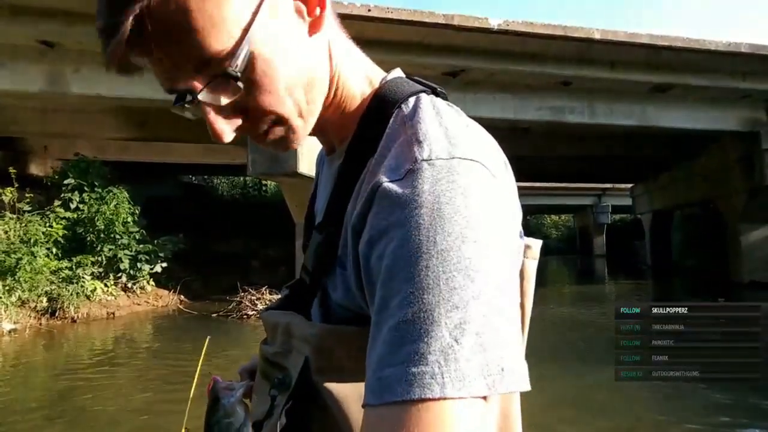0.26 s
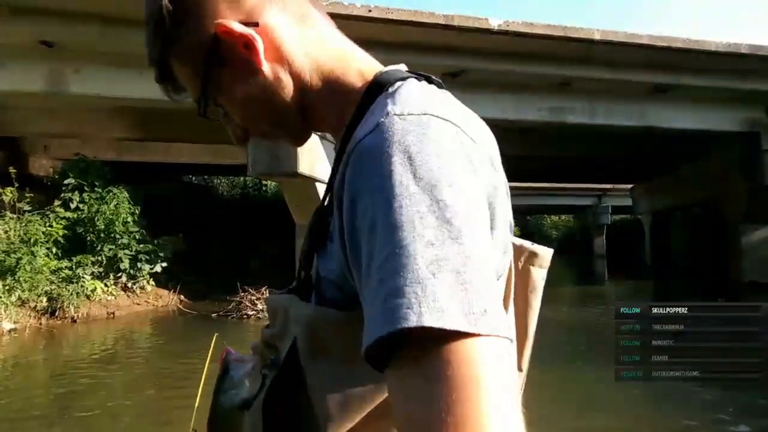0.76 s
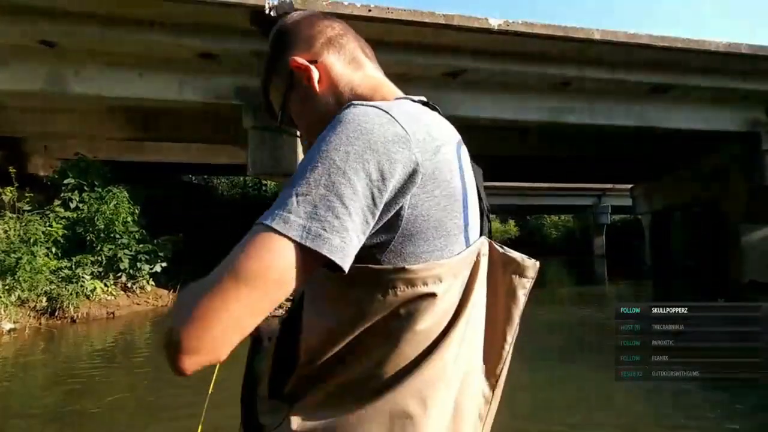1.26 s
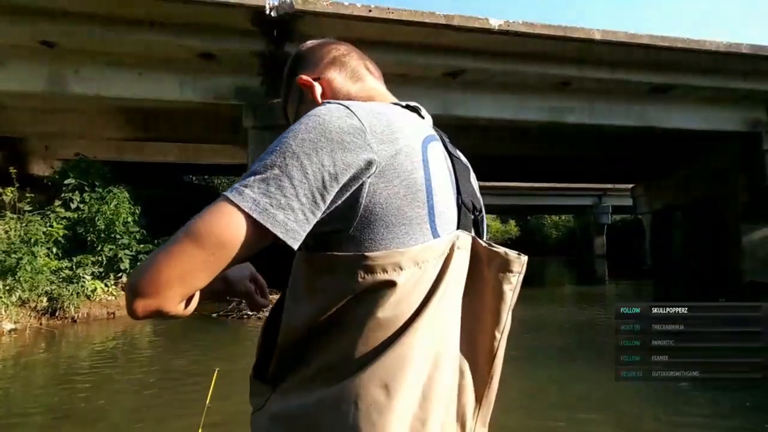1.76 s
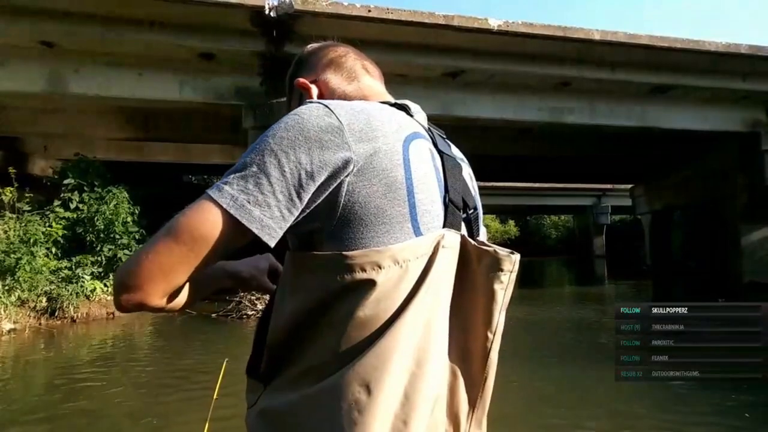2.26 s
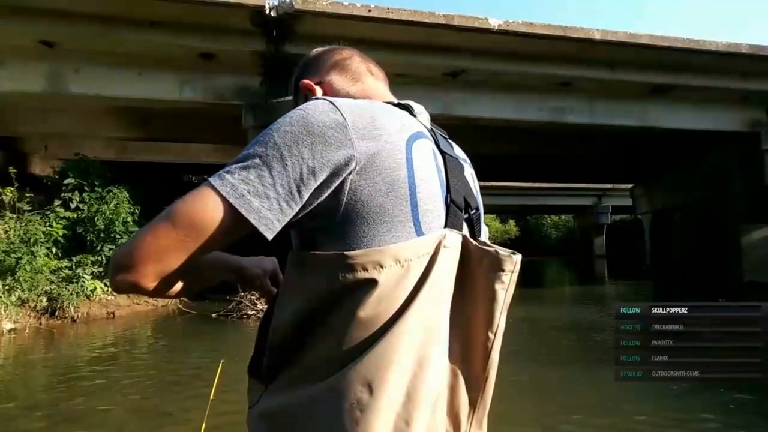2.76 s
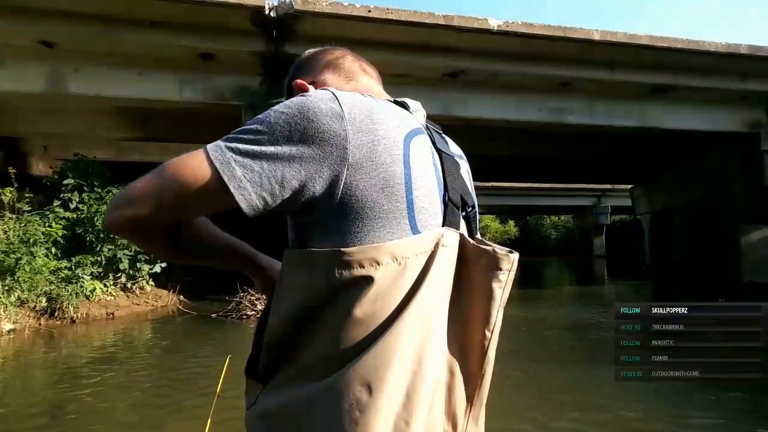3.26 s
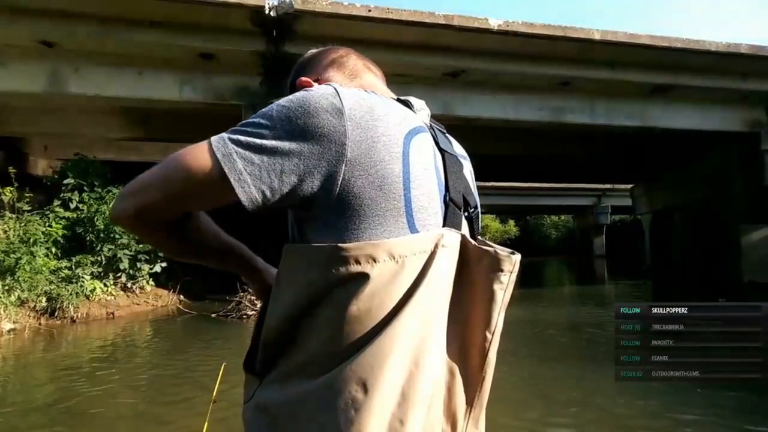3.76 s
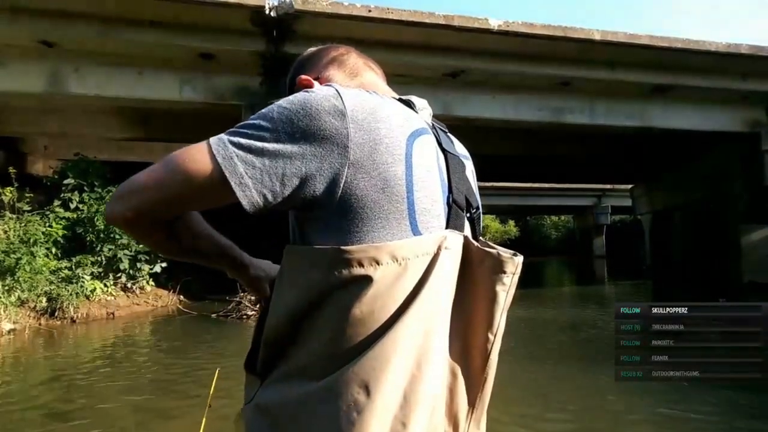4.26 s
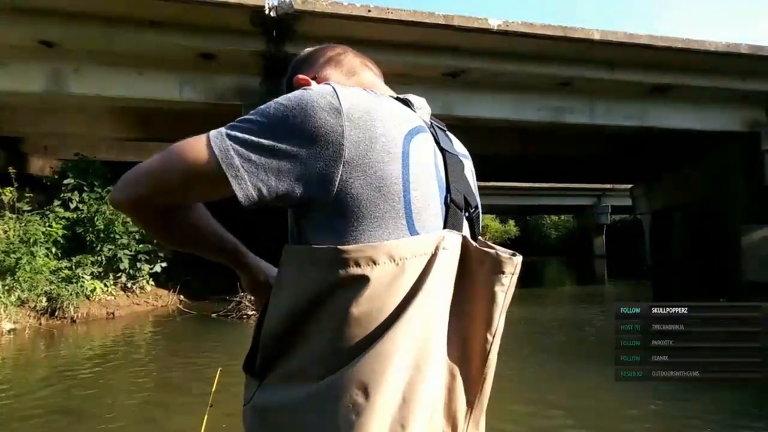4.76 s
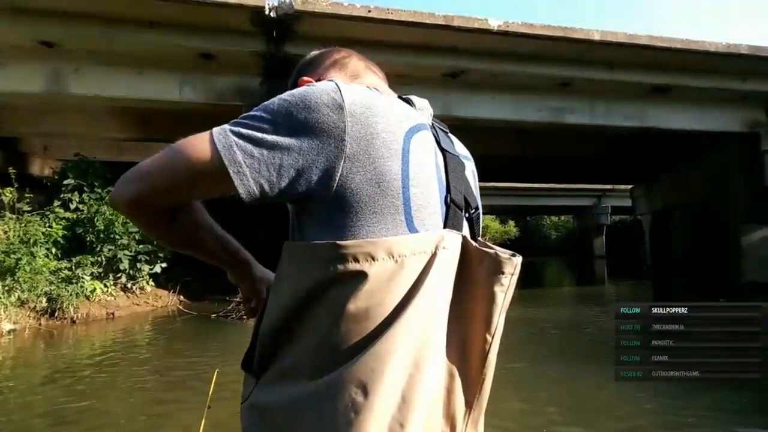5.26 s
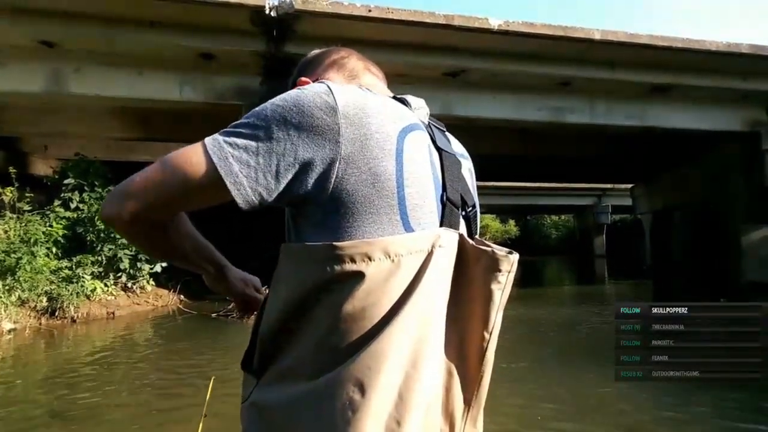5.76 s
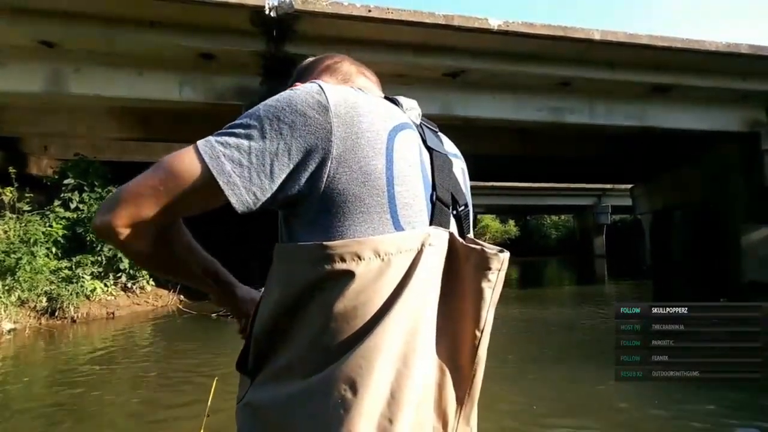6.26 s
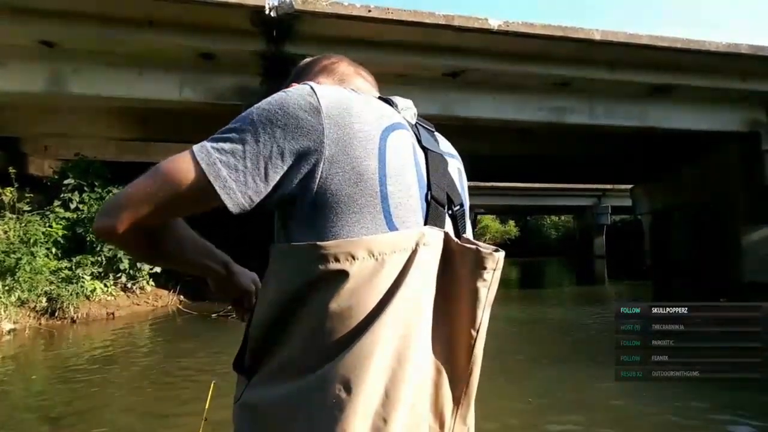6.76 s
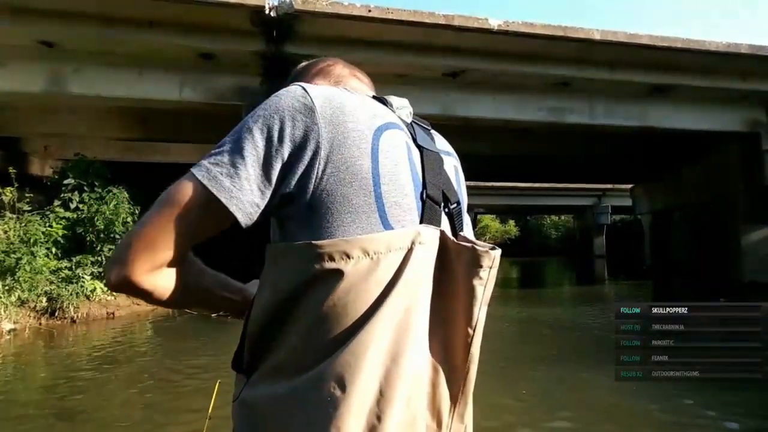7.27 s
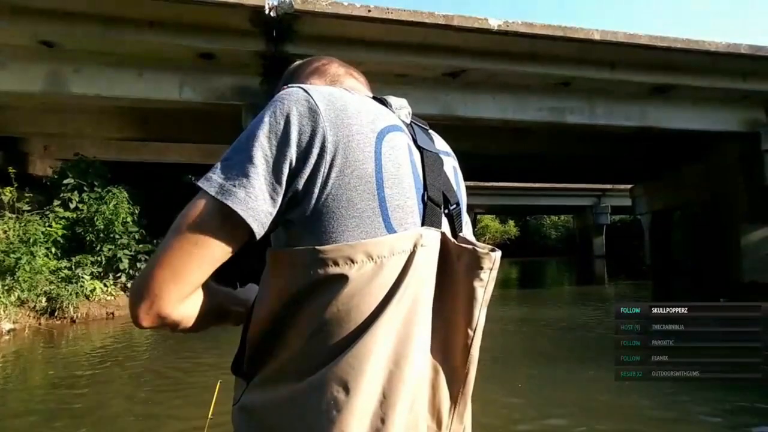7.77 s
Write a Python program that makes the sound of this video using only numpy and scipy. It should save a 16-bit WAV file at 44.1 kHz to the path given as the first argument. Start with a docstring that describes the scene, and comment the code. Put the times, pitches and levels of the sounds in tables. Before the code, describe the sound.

A vehicle engine drones low under a highway bridge and slowly swells over tyre wash, amid shrill crickets, cicadas, small drips, clicks and bird chirps.

```python
"""An engine drones under a highway bridge and slowly grows, over deck rumble and tyre wash, above a summer creek.
Engines are sines with noise bands; road, cicada and katydid are shaped noise; cricket strokes are sagging tones.
A cicada pulses and winds down; a katydid buzzes, later ticks and buzzes again, very high.
A soft low noise thump, as of wind or a knock on the microphone, comes early; a wader makes drips (rising
bubble tones) and tackle clicks (noise rings); a small bird chirps in gliding sines."""
import sys
import numpy as np
from scipy import signal
from scipy.fft import rfft, irfft, next_fast_len
from scipy.io import wavfile
from scipy.ndimage import map_coordinates

SR = 44100
rng = np.random.default_rng(int(sys.argv[2]) if len(sys.argv) > 2 else 0)


def store_pcm(level_fs):
    """Save levels as 16-bit WAV."""
    pcm = np.round(np.clip(level_fs, -1, 1) * 32767).astype(np.int16)
    wavfile.write(sys.argv[1], SR, np.atleast_2d(pcm).T)


N = 353770
T = np.arange(N) / SR  # seconds

# Main engine speed. Each row: time in seconds, firing rate in Hz.
FIRING_RATE = [(0, 84.33), (2, 83.97), (4, 84.22), (6, 83.98), (8, 84.07)]
# Exhaust tone at the firing rate. Each row: time in seconds, rms level in dB before trim.
FIRING_LEVEL = [(0, -38.5), (1, -33.5), (2, -35.5), (4.2, -32.5), (6.8, -31.5), (7.4, -25.5), (8, -22.5)]
# Its octave, which booms under the deck. Each row: time in seconds, rms level in dB before trim.
OCTAVE_LEVEL = [(0.0, -34), (0.33, -30.5), (2.45, -32.5), (2.56, -29.5), (3.41, -30), (3.45, -33.5),
                (3.76, -27.5), (4.81, -26), (4.9, -29), (6.68, -29), (6.77, -25.5), (7.71, -31), (8.0, -21)]
FIRING_TRIM_DB, OCTAVE_TRIM_DB = -0.5, -0.02
# Weaker tones of other engines. Each row: pitch in Hz, level in dB before their common growth.
OTHER_ENGINE_TONES = [(46, -51.5), (115.5, -44), (204, -52.5), (221, -59.5)]
# A slower engine beats against the main one.
RIVAL_HZ, RIVAL_DRIFT_HZ, RIVAL_PEAK_DB = 79.9, 0.9, -37.5
RIVAL_PASSES_S, RIVAL_SPREAD_S = 5, 1.46

# Deck rumble spectrum. Each row: frequency in Hz, relative density in dB per Hz.
RUMBLE_SPECTRUM = [(18, -10), (32, -12), (45, -6), (65, 1), (100, -4), (135, -5.5), (160, 2), (190, -11.5),
                   (250, -15.5), (300, -24.5), (450, -29.5), (900, -55)]
RUMBLE_START_DB, RUMBLE_GROWTH_DB_PER_S = -37.8, 0.28  # the deck shakes harder as traffic nears
# Tyre wash spectrum. Each row: frequency in Hz, relative density in dB per Hz.
TYRE_SPECTRUM = [(200, -6), (420, -7.5), (600, -3), (740, 1.5), (880, 2.5), (1150, 0.5), (1650, -1),
                 (2200, -5.5), (2900, -10), (5500, -10.5), (9500, -23.5), (11500, -33.5), (16000, -29)]
# Tyre wash. Each row: time in seconds, level in dB before trim.
TYRE_LEVEL = [(0, -53), (1.5, -52.5), (4.6, -52.5), (6.2, -51.5), (7, -49.5), (8, -48.5)]
TYRE_TRIM_DB = 4.0
# Tread whine of passing vehicles.
# Each row: loudest time in seconds, spread in seconds, pitch in Hz, width in Hz, peak level in dB.
TREAD_WHINES = [(0, 1.7, 863, 90, -56.5), (0, 1.4, 1384, 110, -59.5), (6.0, 0.75, 1560, 905, -52)]

# Far cricket chorus spectrum. Each row: frequency in Hz, relative density in dB per Hz.
CHORUS_SPECTRUM = [(5600, -64), (5950, -5), (6080, -32), (6400, -12), (6700, -1.5), (7080, 1.5),
                   (7400, -7.5), (7560, -3), (7780, -7), (8020, -4.5), (8250, -12.5), (8700, -22),
                   (9500, -43.5)]
# Near crickets. Each row: start in seconds, end in seconds, first stroke in seconds, pitch in Hz, fall in Hz,
# sounding share of the cycle 0-1, rms level in dB, echo in dB re song, octave in dB re fundamental.
NEAR_CRICKETS = [(-1, 9, .004, 6280, 170, .73, -41, -13, -27), (-1, 5.7, .012, 7170, 170, .6, -44, -5, -42),
                 (-1, 9, .006, 7975, 140, .6, -48.5, -6, -45),
                 (5.5, 7.8, .005, 8385, 130, .55, -48.3, -8, -45)]
# Wing stroke rates of the near crickets. Each entry: strokes per second.
CRICKET_STROKES_PER_S = [32.96, 34.2, 47.7, 57.2]

# Near cicada: effort sinks in an S-curve; pitch, bandwidth and loudness follow it.
CICADA_DB, CICADA_FULL_HZ, CICADA_SPENT_HZ = -44.5, 5227, 3612
CICADA_FULL_WIDTH_HZ, CICADA_SPENT_WIDTH_HZ = 1050, 600
CICADA_TIRES_S, CICADA_WIND_DOWN_S, CICADA_FADE_DB_PER_DECADE = 5.5, 0.6, 17.5
# Even surges while it is fresh.
SURGE_COUNT, SURGE_FIRST_S, SURGE_PERIOD_S, SURGE_DB = 6, 0.39, 0.596, -41.5
SURGE_RISE_S, SURGE_FALL_S = 0.054, 0.12
# Spectrum of surges and far cicadas. Each row: frequency in Hz, relative density in dB per Hz.
RASP_SPECTRUM = [(2700, -39), (3000, -5), (3200, 1.5), (3550, 1.5), (4150, 5), (4800, 4.5), (5400, 2),
                 (6200, -46)]
# Far cicadas. Each row: time in seconds, level in dB.
FAR_CICADA_LEVEL = [(0, -46.5), (4.2, -49.5), (6, -53), (8, -55)]

# Katydid buzzes. Each row: start in seconds, end in seconds, strokes per second, peak level in dB.
BUZZES = [(0.001, .98, 29.0, -49), (7.832, 8.05, 28, -54)]
# Katydid wing resonance. Each row: frequency in Hz, relative density in dB per Hz.
WING_SPECTRUM = [(7500, -13), (9500, -8.5), (11500, -12.5), (13300, -8), (14200, -4), (14650, 2),
                 (15000, -2), (15500, -4)]
# The katydid warms up: ticks come closer over TICK_HURRY_S and louder over TICK_SWELL_S.
TICK_COUNT, TICK_FIRST_S, TICK_RISE_S, TICK_FALL_S = 15, 6.5, 0.0047, 0.007
TICK_SLOW_GAP_S, TICK_FAST_GAP_S, TICK_HURRY_S = 0.102, 0.0807, (6.66, 6.98)
TICK_SOFT_DB, TICK_LOUD_DB, TICK_SWELL_S = -59.5, -46.5, (6.7, 7.25)

# Soft low thump. Each row: centre in Hz, width in Hz, peak level in dB.
THUMP_BANDS = [(57, 26, -24.5), (322, 130, -37), (736, 170, -43.5)]
THUMP_S, THUMP_SPREAD_S = 0.17, 0.048
# Drips. Each row: time in seconds, starting bubble pitch in Hz, level in dB before the attack.
DRIP_BUBBLES = [(1.282, 570, -35), (1.568, 1360, -33), (1.8, 3200, -32.5), (1.85, 600, -39),
                (1.867, 2800, -36), (1.885, 3210, -28.5), (2.046, 3200, -34), (2.062, 2300, -33.5),
                (2.128, 760, -29.5), (2.137, 1150, -35)]
DRIP_T60_S, DRIP_ATTACK_S, DRIP_GLIDE_SHARE = 0.034, 0.0013, 0.063
# Tackle clicks. Each row: time in seconds, starting level in dB, ring centre in Hz.
TACKLE_CLICKS = [(1.293, -32, 3440), (1.888, -36, 3600), (2.038, -30, 4300), (2.19, -49, 10000),
                 (4.669, -40.5, 10200), (5.551, -38, 10800), (6.065, -35, 10400), (6.066, -25.5, 4420),
                 (6.158, -33, 3700)]
CLICK_DECAY_S, CLICK_WIDTH_HZ = 0.0015, 2800

# Bird chirps. Each row: start in seconds, length in seconds, top pitch in Hz, place of the top in the note 0-1,
# arch as share of pitch lost one length from the top, peak level in dB before flutter.
CHIRPS = [(4.012, 0.03, 4700, .5, .9, -36), (4.036, 0.03, 5970, .6, .4, -42),
          (4.068, .022, 3520, 0.7, .3, -44), (4.084, .018, 6000, 0, .23, -38),
          (4.19, .022, 4730, .17, 0.24, -39), (4.268, .028, 4800, 0.03, 0.165, -40),
          (4.325, .018, 3360, .45, .1, -44.5), (4.74, 0.027, 4590, .5, .55, -37.5),
          (5.505, .032, 4950, .42, .55, -39.5), (5.53, .06, 5950, .35, .38, -46),
          (5.568, .02, 3550, .5, .1, -44), (6.318, .034, 6000, 0.97, .45, -46),
          (6.322, .042, 4490, 0.81, 0.54, -39), (7.17, .022, 4270, .9, .25, -42)]
# Long wavering whistle of the bird. Each row: time in seconds, pitch in Hz.
WHISTLE_PITCH = [(6.992, 3790), (7.015, 4260), (7.04, 4440), (7.09, 3980), (7.135, 3700), (7.155, 4100),
                 (7.172, 4750)]
WHISTLE_DB, BIRD_EDGE_S = -44.5, 0.0027  # edge: attack and release

TOP_HZ = 15600


def undb(db):
    """Decibels to gain."""
    return 10 ** (np.asarray(db) / 20)


def unit(x):
    """Scale to rms 1."""
    return x / np.sqrt(np.mean(x ** 2) + 1e-20)


def curves(table):
    """Each column of a timed table, joined by straight lines."""
    s, *columns = np.transpose(table)
    return [np.interp(T, s, c) for c in columns]


def shaped(gain):
    """Noise of rms 1 whose spectrum follows gain(Hz)."""
    size = next_fast_len(N, True)
    hz = np.maximum(np.arange(size // 2 + 1) * SR / size, 1)
    spectrum = rfft(rng.standard_normal(size)) * gain(hz)
    return unit(irfft(spectrum, size)[:N])


def coloured(points):
    """Noise through (Hz, dB) points on a log frequency axis, rolled off past both ends."""
    hz, db = np.transpose(points)

    def gain(f):
        low_cut = 1 + (hz[0] / f / 2) ** 2
        high_cut = 1 + (f / hz[-1] / 2) ** 2
        return undb(np.interp(np.log(f), np.log(hz), db)) / low_cut / high_cut

    return shaped(gain)


def resonance(hz, width_hz):
    """Noise in a resonance whose width is taken at half amplitude."""
    return shaped(lambda f: 1 / (1 + ((f - hz) / width_hz * 2) ** 2))


def walk(rate_hz):
    """Smooth random drift of spread about 1, changing about rate_hz times a second."""
    knots = rng.standard_normal(4096)
    drift = map_coordinates(knots, [T[::32] * rate_hz], order=3, mode="wrap")
    return drift.repeat(32)[:N]


def turns(hz):
    """Running phase, in radians, of a moving frequency."""
    return 2 * np.pi * np.cumsum(hz) / SR


def echo(x, t60_s):
    """Diffuse reflections from banks and concrete: decaying noise of unit energy after a 4 ms gap."""
    t = T[:SR]
    tail = rng.standard_normal(SR) * undb(-60 * t / t60_s) * (t > 0.004)
    return signal.fftconvolve(x, tail / np.sqrt(np.sum(tail ** 2)))[:N]


def engines():
    """A near-steady exhaust tone with a strong octave; a slower engine beats against it, others waver and grow."""
    hz, = curves(FIRING_RATE)
    firing_db, = curves(FIRING_LEVEL)
    octave_db, = curves(OCTAVE_LEVEL)
    phase = turns(hz * (1 + 0.0026 * walk(6)))
    firing = undb(firing_db + FIRING_TRIM_DB + 1.2 * walk(12)) * np.sin(phase + 0.31 * walk(11))
    octave_wave = np.sin(2 * phase) + undb(-32) * np.sin(3 * phase)  # with a trace of third harmonic
    octave = undb(octave_db + OCTAVE_TRIM_DB + 1.1 * walk(11)) * octave_wave
    nearness = 1 / np.hypot(1, (T - RIVAL_PASSES_S) / RIVAL_SPREAD_S)
    rival_wave = np.sin(turns(RIVAL_HZ + RIVAL_DRIFT_HZ * walk(1.97)))
    rival = undb(RIVAL_PEAK_DB) * nearness * rival_wave
    others = sum(undb(db) * resonance(f, 4.6) for f, db in OTHER_ENGINE_TONES)
    growth_db = np.interp(T, [1.5, 4.2], [-6, 1.5])
    return np.sqrt(2) * (firing + octave + rival) + others * undb(growth_db)  # sqrt(2): sine levels are rms


def road():
    """Wheels shake the deck, tyres hiss beyond its edge; single vehicles' treads sing as they pass."""
    rumble_db = RUMBLE_START_DB + RUMBLE_GROWTH_DB_PER_S * T + 1.0 * walk(8.9)
    rumble = coloured(RUMBLE_SPECTRUM) * undb(rumble_db)
    tyre_db, = curves(TYRE_LEVEL)
    wash = coloured(TYRE_SPECTRUM) * undb(tyre_db + TYRE_TRIM_DB + 0.5 * walk(9.8))
    whine = 0
    for peak_s, spread_s, hz, width_hz, db in TREAD_WHINES:
        passing = np.exp(-((T - peak_s) / spread_s) ** 2)
        whine = whine + undb(db) * resonance(hz, width_hz) * passing
    return rumble + wash + whine


def crickets():
    """Each stroke is a short tone that catches once and sags as the wing slows; far singers blur into a band."""
    out = coloured(CHORUS_SPECTRUM) * undb(-38.5 + 0.5 * walk(12.0))
    for rate, row in zip(CRICKET_STROKES_PER_S, NEAR_CRICKETS):
        start_s, end_s, first_s, hz, fall_hz, share, db, echo_db, octave_db = row
        cycle = ((T - first_s) * rate + 0.012 * walk(3)) % 1
        stroke = np.minimum(cycle / share, 1)  # silent at 1
        catch = np.exp(-((stroke - 0.58) / 0.06) ** 2)
        phase = turns(hz - fall_hz * stroke ** 2.5 + 24 * walk(300))
        flutter = undb(0.4 * walk(30) + 1.7 * walk(500))
        force = np.abs(np.sin(np.pi * stroke)) ** 0.6 * (1 - 0.55 * catch) * flutter
        fundamental = unit(force * np.sin(phase))
        octave = unit(force ** 2 * (1 - stroke) * np.sin(2 * phase))  # the file bites hardest early
        singing = np.clip((T - start_s) / 0.2, 0, 1) * np.clip((end_s - T) / 0.023, 0, 1)
        song = (fundamental + undb(octave_db) * octave) * undb(db) * singing
        out = out + song + undb(echo_db) * echo(song, 0.32)
    return out


def reflected(x):
    """A few hard reflections off deck and water comb the sound into fixed fine bands."""
    lags = rng.integers(150, 1300, 7)  # samples
    return unit(x + 0.25 * sum(np.roll(x, lag) for lag in lags))


def surges(count):
    """Evenly spaced swells that rise faster than they fall."""
    since_s = T - SURGE_FIRST_S - SURGE_PERIOD_S * np.arange(count)[:, None]
    spread_s = np.where(since_s < 0, SURGE_RISE_S, SURGE_FALL_S)
    return np.exp(-0.5 * (since_s / spread_s) ** 2).sum(axis=0)


def cicada():
    """Rapid tymbal buckles ring the abdomen; the song surges, then sinks in pitch, narrows and dies away."""
    effort = 1 / (1 + np.exp((T - CICADA_TIRES_S) / CICADA_WIND_DOWN_S))
    buckles = 1 + 0.16 * np.sin(turns(260 + 25 * walk(22)))
    phase = turns(CICADA_SPENT_HZ + (CICADA_FULL_HZ - CICADA_SPENT_HZ) * effort)

    def ring(width_hz):
        """Noise band riding on the moving pitch."""
        return resonance(0, width_hz) * np.sin(phase) + resonance(0, width_hz) * np.cos(phase)

    fresh = ring(CICADA_FULL_WIDTH_HZ) * np.sqrt(effort)
    spent = ring(CICADA_SPENT_WIDTH_HZ) * np.sqrt(1 - effort)
    song_db = CICADA_DB + CICADA_FADE_DB_PER_DECADE * np.log10(effort)
    song = reflected((fresh + spent) * buckles) * undb(song_db)
    far_db, = curves(FAR_CICADA_LEVEL)
    rasp_gain = np.hypot(undb(SURGE_DB) * surges(SURGE_COUNT), undb(far_db + 0.23 * walk(8)))
    return song + reflected(coloured(RASP_SPECTRUM) * buckles) * rasp_gain


def ticks(count):
    """Single scrapes that hurry and swell."""
    force, s = 0, TICK_FIRST_S
    for _ in range(count):
        db = np.interp(s, TICK_SWELL_S, [TICK_SOFT_DB, TICK_LOUD_DB])
        spread_s = np.where(T < s, TICK_RISE_S, TICK_FALL_S)
        force = force + undb(db) * np.exp(-np.abs(T - s) / spread_s)
        s = s + np.interp(s, TICK_HURRY_S, [TICK_SLOW_GAP_S, TICK_FAST_GAP_S])
    return force


def katydid():
    """A toothed file scrapes in buzzes and single ticks; teeth catch with uneven force."""
    force = ticks(TICK_COUNT)
    for start_s, end_s, rate, db in BUZZES:
        strokes = undb(4.5 * (np.cos(2 * np.pi * rate * (T - start_s)) - 1))
        force = force + undb(db) * strokes * (T > start_s - 0.01) * (T < end_s)
    teeth = undb(1.4 * walk(1000))
    return force * unit(teeth * coloured(WING_SPECTRUM))


def thump():
    """A soft low thump, as of wind or a knock on the microphone: noise bands that swell and fade."""
    push = np.exp(-np.abs(T - THUMP_S) / THUMP_SPREAD_S)
    return push * sum(undb(db) * resonance(hz, width_hz) for hz, width_hz, db in THUMP_BANDS)


def wader():
    """Drops ring in the creek as rising bubbles; tackle clicks close by as short noise rings."""
    out, t = np.zeros(N), T[:SR // 5]
    ring = np.exp(-np.log(1000) * t / DRIP_T60_S) * (1 - np.exp(-t / DRIP_ATTACK_S))
    glide = 1 + DRIP_GLIDE_SHARE * np.minimum(t / DRIP_T60_S, 1)
    for s, hz, db in DRIP_BUBBLES:
        at = int(s * SR)
        out[at:at + len(t)] += undb(db) * ring * np.sin(turns(hz * glide))
    for s, db, hz in TACKLE_CLICKS:
        at = int(s * SR)
        out[at:at + len(t)] += undb(db) * np.exp(-t / CLICK_DECAY_S) * resonance(hz, CLICK_WIDTH_HZ)[:len(t)]
    return out


def bird():
    """Quick chirps on parabolic pitch arches and one long whistle ring on under the bridge."""
    edge_s = np.minimum(T - WHISTLE_PITCH[0][0], WHISTLE_PITCH[-1][0] - T)
    whistle_hz, = curves(WHISTLE_PITCH)
    out = undb(WHISTLE_DB) * np.clip(edge_s / BIRD_EDGE_S, 0, 1) * np.sin(turns(whistle_hz))
    for start_s, length_s, top_hz, top_at, arch, db in CHIRPS:
        u = np.linspace(0, 1, int(length_s * SR))  # place in the note
        hz = top_hz * (1 - arch * (u - top_at) ** 2)
        fade = np.clip(np.minimum(u, 1 - u) * length_s / BIRD_EDGE_S, 0, 1)
        at = int(start_s * SR)
        out[at:at + len(u)] += undb(db) * fade * np.sin(turns(hz))
    out = out * undb(1.6 * walk(150))  # flutter
    return out + undb(-3.5) * echo(out, 0.5)


def scene():
    """Everything as heard from the middle of the creek."""
    return (engines() + road() + crickets() + cicada() + katydid() + thump() + wader() + bird())[None]


def record(dry):
    """A steep elliptic low-pass cuts the very top."""
    return signal.sosfilt(signal.ellip(10, 0.2, 80, TOP_HZ, fs=SR, output="sos"), dry)


dry = scene()
out = record(dry)
store_pcm(out)
```